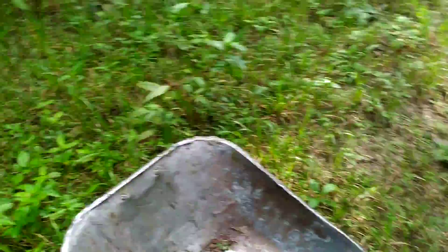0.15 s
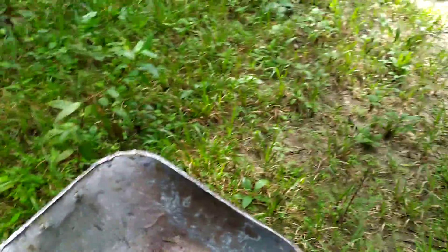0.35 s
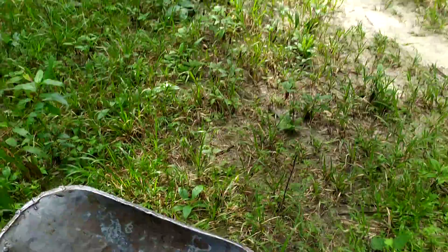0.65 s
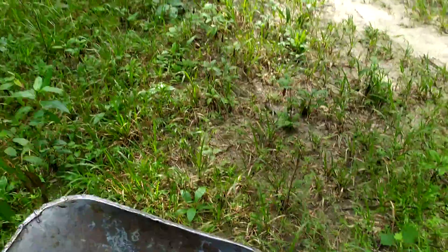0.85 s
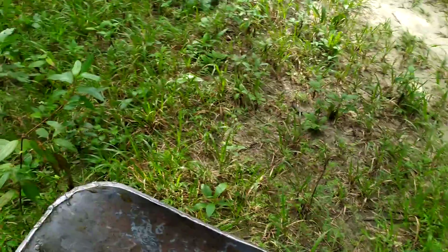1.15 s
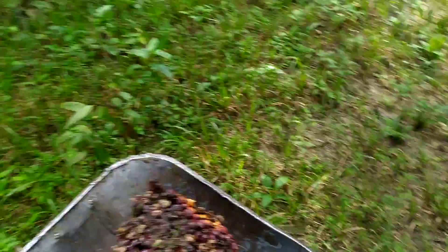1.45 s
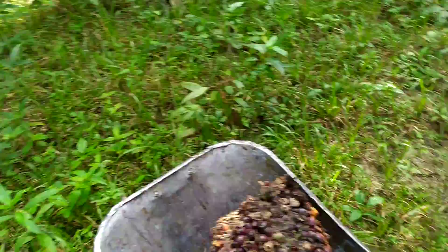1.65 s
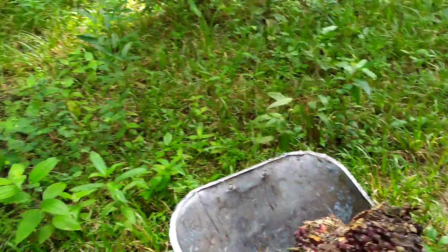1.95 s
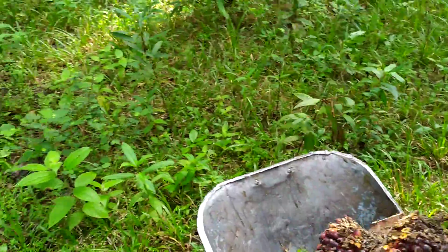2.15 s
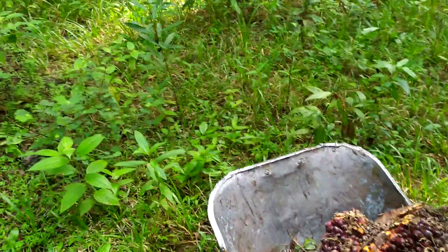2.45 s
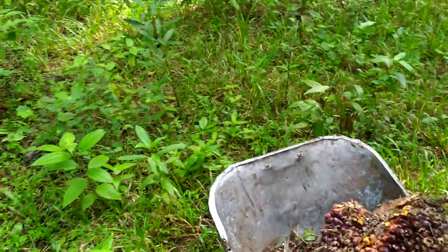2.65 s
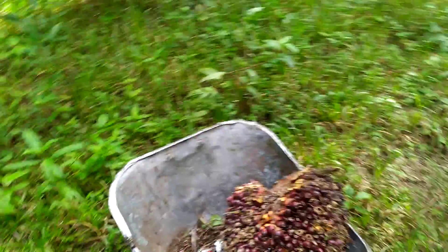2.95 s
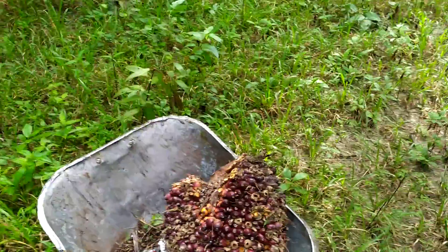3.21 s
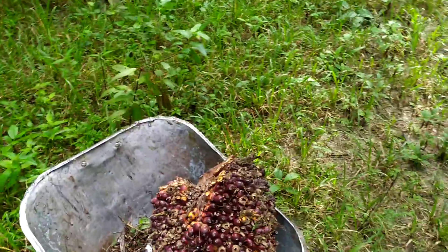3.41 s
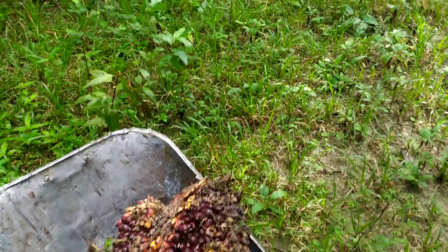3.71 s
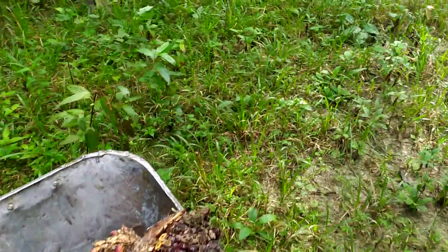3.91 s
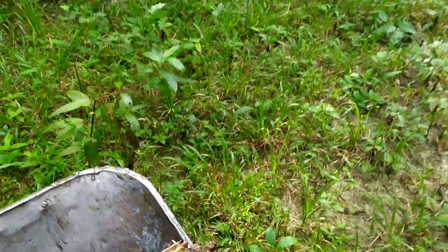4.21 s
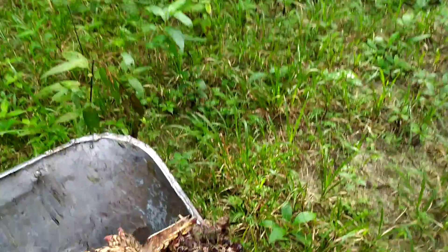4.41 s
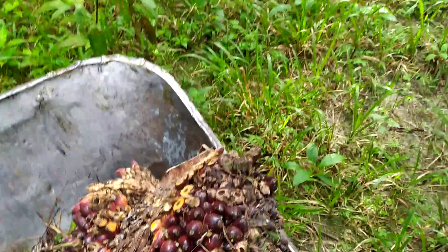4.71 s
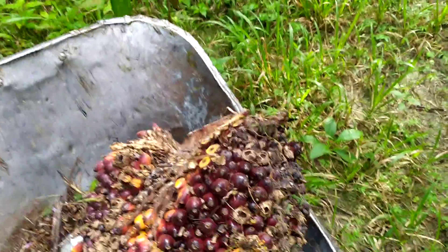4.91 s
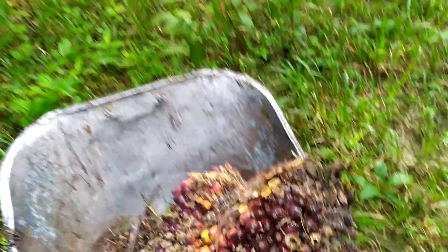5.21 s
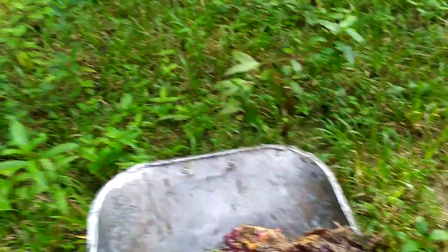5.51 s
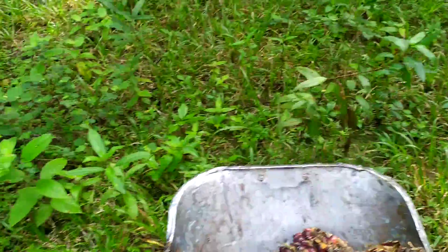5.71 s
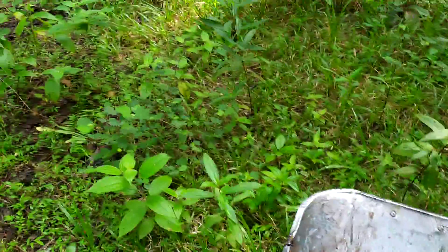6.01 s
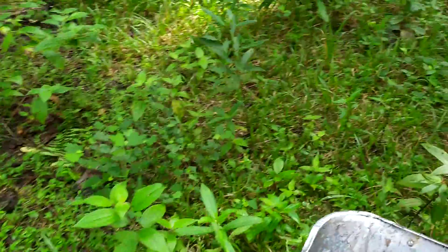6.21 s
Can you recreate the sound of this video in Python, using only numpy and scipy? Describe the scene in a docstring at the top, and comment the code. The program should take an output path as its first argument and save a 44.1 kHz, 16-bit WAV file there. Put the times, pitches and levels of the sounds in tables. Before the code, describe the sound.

Outdoors, over a faint, high insect hiss, a nearby steel wheelbarrow booms twice as spiky fruit bunches land in it, the second louder. Dry fibres crackle and fruit rolls against the tray, then things go quiet. Two sharp, ringing clangs of a metal tool come with further crunching thumps and tumbling fruit. Finally the wheelbarrow is pushed on, with a light rattle and rustling grass.

```python
"""Loading palm fruit into a wheelbarrow

Heavy bunches land in a steel wheelbarrow on rough grass. The tray booms, dry spikes on the bunches
crunch and loose fruit tumbles; twice a steel tool clangs on the rim and rings. After each landing the
load settles. Then the barrow is pushed on through swishing grass. Insects hiss all around."""
import sys
import numpy as np
from scipy import signal
from scipy.fft import rfft, irfft, next_fast_len
from scipy.io import wavfile

SR = 44100
rng = np.random.default_rng(int(sys.argv[2]) if len(sys.argv) > 2 else 0)


def transcribe(signal):
    """Save signal, clipped to [-1, 1], as a 16-bit WAV file at the path in sys.argv[1]."""
    frames = np.atleast_2d(signal).T
    limited = np.clip(frames, -1, 1)
    pcm = np.round(limited * 32767).astype(np.int16)
    wavfile.write(sys.argv[1], SR, pcm)


N = 280476
TIME = np.arange(N) / SR

# the tones at which the side panels of the loaded tray ring: f/Hz
PANEL_TONES = [105, 145, 180, 258, 312, 345, 378, 410, 438, 475, 505, 560, 622, 648, 725, 763, 840, 903,
               965, 1028, 1135, 1215, 1340, 1590, 1790]
# how alike the two ears hear a sound: f/Hz, likeness (0 to 1)
EAR_LIKENESS = [(50, 0.83), (200, 0.96), (400, 0.94), (700, 0.77), (1300, 0.33), (2400, 0.15), (8000, 0.02)]
# pushes through the grass: t/s, rustle level/dB, swish level/dB, swish build-up/s
GRASS_PUSHES = [(5.658, -50, -43.5, 0.12), (6.27, -49.5, -45.5, 0.15)]


def from_db(db):
    """Turn decibels into a gain to multiply by."""
    return 10 ** (np.asarray(db) / 20)


def together_db(*gains):
    """The level of unrelated sounds heard together: their powers add."""
    return 10 * np.log10(sum(g ** 2 for g in gains) + 1e-20)


def unit_power(x):
    """Scale a signal to an average power of 1."""
    return x / np.sqrt(np.mean(x ** 2) + 1e-20)


def at_hz(points, hz):
    """Read between the rows of a (frequency, value) table, with octaves evenly spaced."""
    f, value = np.transpose(points)
    return np.interp(np.log(np.maximum(hz, 1)), np.log(f), value)


def in_time(points):
    """Join the rows of a (time, value) table with straight lines."""
    return np.interp(TIME, *np.transpose(points))


def add(out, start_s, sound):
    """Mix a sound in at its start time."""
    i = max(round(start_s * SR), 0)
    out[:, i:i + sound.shape[-1]] += sound[..., :N - i]


def fade(t, t60, rise_s):
    """Rise quickly, then die away; t60 is the time in seconds to fall by 60 dB."""
    return (1 - np.exp(-t / rise_s)) * np.exp(-np.log(1000) * t / t60)


def swells(rows, width_s):
    """A gain that rises and falls in a bell shape around each (time, level) row."""
    return sum(from_db(db) * np.exp(-.5 * ((TIME - s) / width_s) ** 2) for s, db, *_ in rows)


def drift(per_s, count=N):
    """A random wobble of size about 1 that heads for a new value per_s times a second."""
    targets = rng.standard_normal(int(per_s * count / SR) + 2)
    return unit_power(np.interp(TIME[:count] * per_s, np.arange(len(targets)), targets))


def two_ears(pair, hz):
    """Turn two unrelated signals into left and right, alike in the bass only."""
    alike = np.clip(at_hz(EAR_LIKENESS, hz), 0, .995)
    mid, side = np.sqrt(1 + alike) * pair[0], np.sqrt(1 - alike) * pair[1]
    return np.array([mid + side, mid - side])


def coloured(white, spectrum, tilt_db=0):
    """Shape stereo noise to a spectrum, tilted by tilt_db per octave, at power 1."""
    count = white.shape[-1]
    size = next_fast_len(count)
    hz = np.maximum(np.fft.rfftfreq(size, 1 / SR), 1)
    bass_cut = 1 / np.sqrt(1 + (spectrum[0][0] / hz) ** 4)
    gain = bass_cut * from_db(at_hz(spectrum, hz) + tilt_db * np.log2(hz))
    shaped = two_ears(rfft(white, size), hz) * gain
    return unit_power(irfft(shaped, size)[:, :count])


def grainy(count, spread_db, size=24):
    """Stereo noise made of half-millisecond grains of uneven strength."""
    grains = from_db(spread_db * np.clip(rng.standard_normal(count // size + 1), -2.5, 2.5))
    return rng.standard_normal((2, count)) * np.repeat(grains, size)[:count]


def air_and_insects(air_db=-64.5, insect_db=-57):
    """Insects hiss, wavering slightly, over the faint noise of still air."""
    # spectra of the two sounds: f/Hz, level/dB
    air_spectrum = [(110, -9), (230, 2.5), (370, 4), (600, -4), (1200, -10.5), (2500, -11), (4000, -11.5),
                    (9000, -6.5), (16000, -9)]
    insect_spectrum = [(3000, -34.5), (3950, -17.5), (4500, 5), (5200, -1.5), (5800, 5), (6300, 0),
                       (7000, 3), (8300, -1.5), (9500, -17), (15000, -18.5)]
    air = from_db(air_db) * coloured(rng.standard_normal((2, N)), air_spectrum)
    insect_gain = from_db(insect_db + 1.1 * drift(4.8))
    return air + insect_gain * coloured(rng.standard_normal((2, N)), insect_spectrum)


def rumble(shudder, breeze_db=-62):
    """A breeze and the shaking barrow make a soft, deep rumble that briefly swells three times."""
    # deep swells (wind at the start and near 4 s, a bunch's low thump at 1.1 s): t/s, level/dB
    deep_swells = [(0.03, -52), (1.1, -42.5), (4.02, -51)]
    # spectrum of the rumble: f/Hz, level/dB
    spectrum = [(30, -24.5), (40, -2.5), (55, 6.5), (80, -5), (130, -10.5), (250, -27.5), (600, -64.5)]
    level_db = together_db(shudder, from_db(breeze_db), swells(deep_swells, width_s=0.066))
    return from_db(level_db + drift(60)) * coloured(rng.standard_normal((2, N)), spectrum)


def rustle(level_db, boost_db=6, flutter_db=2, crackles_per_s=63, crackle_db=-1, crackle_t60=0.011):
    """Grass and fibres brush along the steel; stalks that catch make tiny crackles."""
    # spectrum of the brushing: f/Hz, level/dB
    spectrum = [(600, -11), (1300, -1.5), (2800, -2.5), (5000, -3), (9000, 1), (12000, -3), (16000, -7.5)]
    catches = (rng.random(N) < crackles_per_s / SR) * rng.random(N) * from_db(crackle_db)
    decay = np.exp(-np.log(1000) / (crackle_t60 * SR))
    crackle = signal.lfilter([1], [1, -decay], catches + 1e-18)
    gain = from_db(level_db + boost_db + flutter_db * drift(45))
    return gain * (1 + crackle) * coloured(grainy(N, spread_db=0.5), spectrum)


def loose_fruit(level_db, per_s, spread_db, t60, low_hz, soft_hz):
    """Fruit rolls and drops, tapping the panels; light fruit misses low tones, soft fruit high ones."""
    drops = (rng.random(N) < per_s / SR) * from_db(spread_db * np.minimum(rng.standard_normal(N), 1))
    at, out = np.flatnonzero(drops), np.zeros((2, N))
    decay = np.exp(-np.log(1000) / (t60 * SR))
    for hz in PANEL_TONES:
        taps = np.full((2, N), 1e-18)
        taps[:, at] = drops[at] * two_ears(rng.standard_normal((len(at), 2)).T, hz)
        step = 2 * np.pi * hz / SR
        ringing = signal.lfilter([0, np.sin(step)], [1, -2 * decay * np.cos(step), decay ** 2], taps)
        weight = 1 / np.hypot(1, (low_hz / hz) ** 2) / np.hypot(1, hz / soft_hz)
        out += weight * ringing
    return from_db(level_db) * unit_power(out)


def through_sheet(x, direct_db=-1.5, sheet_db=-6.5, t60=0.1, tones=110):
    """Whatever is crushed against the tray also sets off short, tinny tones in its thin steel."""
    t = TIME[:SR // 8]
    hz = rng.uniform(900, 15500, (tones, 1))
    strength = rng.standard_normal((2, tones))
    ring = strength @ np.sin(2 * np.pi * hz * t) * fade(t, t60, rise_s=0.00027)
    ring /= np.sqrt(np.sum(ring ** 2, axis=1, keepdims=True))
    return from_db(direct_db) * x + from_db(sheet_db) * signal.fftconvolve(x, ring, axes=1)[:, :N]


def dry_spikes(clump_db=1.5, snap_t60=0.0078):
    """Dry fibres break in clumps of tiny cracks, single stalks with one bright snap."""
    # spikes crushed against the steel: t/s, level/dB, t60/s, tilt/(dB per octave)
    crunches = [(0.592, -16.5, 0.18, 5.5), (0.989, -37, 0.087, 2.5), (1.112, -20, 0.063, -2.5),
                (1.12, -5.5, 0.05, 2.7), (1.129, -25, 0.73, 1), (1.331, -27.5, 0.16, 0.5),
                (1.354, -28.5, 0.26, 0), (1.688, -35, 0.16, 8), (1.853, -22.5, 0.036, 1.5),
                (2.118, -45, 0.23, 1), (2.204, -31, 0.15, 3.5), (2.238, -29.5, 0.15, 3),
                (2.327, -30.5, 0.051, -2), (2.59, -38, 0.13, 2.5), (2.972, -44, 0.1, 9),
                (3.569, -48, 0.62, 10), (4.071, -11, 0.059, -0.5), (4.078, -26.5, 0.41, 2),
                (4.440, -11.5, 0.078, 3), (4.511, -19.5, 0.27, -0.5), (4.683, -35, 0.16, -2)]
    # stalks snapping: t/s, level/dB
    snaps = [(1.121, -10), (1.496, -25.5), (1.524, -30), (1.587, -45), (1.597, -25.5), (1.612, -29),
             (1.679, -26), (1.691, -20.5), (1.846, -22.5), (1.853, -23), (1.934, -34), (1.952, -35),
             (2, -24.5), (2.12, -33), (2.207, -21.5), (2.328, -36), (2.592, -38), (2.941, -32),
             (6.098, -30.5)]
    # spectrum of breaking fibres: f/Hz, level/dB
    spectrum = [(700, 14), (1300, 11.5), (2500, 3), (4500, 0), (7000, -1.5), (11000, -7), (16000, -15.5)]
    out = np.zeros((2, N))
    t = TIME[:SR // 2]
    for s, db, t60, tilt_db in crunches:
        clumps = unit_power(from_db(clump_db * drift(300, len(t))))
        cracks = coloured(grainy(len(t), spread_db=-2.0), spectrum, tilt_db)
        add(out, s, from_db(db) * clumps * fade(t, t60, rise_s=0.0012) * cracks)
    out = through_sheet(out)
    t = TIME[:SR // 20]
    for s, db in snaps:
        bright_noise = coloured(rng.standard_normal((2, len(t))), spectrum, tilt_db=7.5)
        add(out, s, from_db(db) * fade(t, snap_t60, rise_s=.0001) * bright_noise)
    return out


def settling(rise_s=0.085, rolling_db_per_s=21, resting_db_per_s=135.5, shudder_db=-18):
    """Gains of fruit, fibres and the barrow's shudder; the load slows as it rolls, then stops fast."""
    # a bunch lands or slips: t/s, fruit level/dB, fibre level/dB, rolling time/s
    landings = [(0.594, -46.5, -45.5, 0.27), (1.116, -28, -66, 0.3), (1.66, -46, -64, 0.64),
                (2.2, -46.5, -77, 0.2), (4.071, -39.5, -51, 0.25), (4.441, -27.5, -56, 0.32)]
    fruit, fibres, shudder = np.zeros((3, N))
    for s, fruit_db, fibre_db, rolling_s in landings:
        t = np.maximum(TIME - s, 0)
        fall_db = rolling_db_per_s * np.minimum(t, rolling_s)
        fall_db += resting_db_per_s * np.maximum(t - rolling_s, 0)
        motion = (1 - np.exp(-t / rise_s)) * from_db(-fall_db)
        fruit += from_db(fruit_db) * motion
        fibres += from_db(fibre_db) * motion
        shudder += from_db(fruit_db + shudder_db) * fade(t, t60=0.47, rise_s=.004)
    return fruit, fibres, shudder


def panels(t, centre_hz, t60, contact_s, load_shift=0.02555, top_hz=1150):
    """One blow rings all panel tones, most of all near centre_hz; the load shifts them a little."""
    count = len(PANEL_TONES)
    hz = np.array(PANEL_TONES) * (1 + load_shift * rng.standard_normal(count))
    weight = 1 / (1 + np.log2(hz / centre_hz) ** 2) ** 2
    weight /= np.hypot(1, (hz / top_hz) ** 4)   # soft fruit cannot drive the highest tones
    size_and_phase = rng.uniform(0.34, 1, (2, count)) * np.exp(2j * np.pi * rng.random((2, count)))
    strength = two_ears(size_and_phase, hz) * weight
    phase = 2 * np.pi * hz[:, None] * t
    shape = fade(t, t60, rise_s=contact_s)
    wave = (strength.real @ np.sin(phase) + strength.imag @ np.cos(phase)) * shape
    return unit_power(wave) * np.sqrt(np.mean(shape ** 2))


def tray_booms(stiffening=0.055, ears_apart_rad=0.099, lowest_hz=75):
    """The tray's floor booms, a little higher while deeply bent, and its side panels clatter."""
    # bunches hitting the floor: t/s, boom level/dB, boom f/Hz, boom t60/s, panel level/dB
    blows = [(0.595, -12.5, 205.3, 0.23, -14.5), (0.617, -13, 201.7, 0.14, -27.5),
             (0.642, -20.5, 206, 0.13, -36), (0.656, -17.5, 205, 0.084, -31), (0.693, -28, 211, 0.13, -47),
             (0.721, -26, 211, 0.086, -43), (0.755, -24.5, 202, 0.077, -41), (0.784, -34, 183, 0.16, -46),
             (0.891, -30.5, 286, 0.051, -42.5), (0.936, -38.5, 208, 0.11, -56), (1.11, -14, 253, 0.07, -24),
             (1.122, -19, 148.3, 0.31, -22), (1.141, -15.5, 212, 0.12, -16.5),
             (1.169, -7.5, 230, 0.042, -25), (1.183, -8, 265, 0.067, -24.5), (1.202, -15, 215, 0.06, -26.5),
             (1.218, -21.5, 253.6, 0.14, -21), (1.242, -17.5, 233, 0.15, -31),
             (1.261, -18.5, 226, .09, -28.5), (1.316, -13, 246, 0.13, -20),
             (1.355, -22.5, 242, 0.16, -20.5), (1.379, -22.5, 208.2, 0.073, -22.5),
             (1.457, -19, 245, 0.053, -31.5), (1.688, -34.5, 206, 0.073, -53),
             (1.85, -30.5, 306, 0.033, -37.5), (1.998, -33, 139, 0.019, -46),
             (2.056, -40.5, 166, 0.063, -53), (2.208, -28, 331, 0.092, -32),
             (2.257, -29.5, 341, 0.061, -31), (2.329, -39, 269, 0.24, -40.5),
             (2.418, -32, 239, 0.15, -42.5), (2.495, -47.5, 201, 0.23, -59), (2.591, -40.5, 197, 0.18, -41),
             (2.776, -58.5, 352, 0.34, -59.5), (4.078, -11, 263, 0.14, -18), (4.108, -20, 203.7, 0.23, -23),
             (4.217, -33, 263, 0.15, -31.5), (4.246, -34, 242, 0.25, -44), (4.312, -40.5, 221, 0.28, -41),
             (4.442, -18, 229, 0.24, -12.5), (4.458, -12.5, 217, 0.028, -12), (4.51, -14, 253, 0.095, -10),
             (4.525, -12, 437, 0.099, -19), (4.555, -12.5, 221.6, 0.16, -17),
             (4.602, -21, 223, 0.23, -21.5), (4.648, -27, 223, 0.18, -47), (4.683, -26.5, 222, 0.15, -22.5),
             (4.724, -25.5, 218, 0.14, -27), (4.749, -26, 212, 0.16, -32.5), (4.787, -27, 219, 0.13, -28.5),
             (4.823, -30.5, 223, 0.24, -35), (4.858, -33.5, 212.4, 0.17, -52),
             (4.894, -35.5, 215.4, 0.17, -52), (4.934, -37, 187, 0.18, -39), (5.602, -39.5, 352, 0.16, -39),
             (5.625, -44, 180, 0.14, -37), (5.7, -45.5, 247, .18, -47), (6.233, -41.5, 213, 0.12, -32)]
    out = np.zeros((2, N))
    for s, boom_db, boom_hz, boom_t60, panel_db in blows:
        hardness_db = panel_db - boom_db   # a harder hit rings the panels higher and shorter
        centre_hz = 495 * 2 ** (hardness_db / 11.5)
        panel_t60 = 0.14 * 2 ** (-hardness_db / 12.5)
        t = TIME[:int(max(boom_t60, panel_t60) * SR)]
        bend = fade(t, boom_t60, rise_s=0.00056)
        # the bunch bounces, so the boom wobbles in pitch and strength
        sway, press = .065 * drift(130, len(t)), from_db(1.8 * drift(110, len(t)))
        pitch_hz = boom_hz * (1 + stiffening * (bend - .5) + sway)
        ear_phase = ears_apart_rad * rng.standard_normal((2, 1))
        boom = bend * press * np.sqrt(2) * np.sin(2 * np.pi * np.cumsum(pitch_hz) / SR + ear_phase)
        clatter = panels(t, centre_hz, panel_t60, contact_s=0.0051)
        add(out, s, from_db(boom_db) * boom + from_db(panel_db) * clatter)
    return signal.sosfilt(signal.butter(2, lowest_hz, "high", fs=SR, output="sos"), out)


def fruit_knocks():
    """A single hard fruit is too light to move the floor and rings only the panels."""
    # knocks on the side panels: t/s, level/dB, centre f/Hz, t60/s
    knocks = [(0.6, -23, 850, 0.19), (0.988, -48, 620, 0.12), (1.172, -20, 790, 0.16),
              (1.243, -15, 820, 0.052), (1.266, -18, 830, 0.079), (1.458, -11.5, 753, 0.025),
              (1.761, -30, 1360, 0.021), (2.121, -34, 660, 0.022), (2.18, -39.5, 610, 0.13),
              (2.23, -26.5, 404, 0.11), (4.073, -22, 1000, 0.078), (4.747, -25, 750, 0.15),
              (3.775, -61, 1400, 0.033), (3.815, -58.5, 521, 0.047), (5.626, -36, 800, 0.052),
              (5.697, -29, 496, 0.051), (5.829, -38, 850, 0.045), (6.243, -37, 950, 0.06)]
    out = np.zeros((2, N))
    for s, db, centre_hz, t60 in knocks:
        add(out, s, from_db(db) * panels(TIME[:int(t60 * SR)], centre_hz, t60, contact_s=0.0018))
    return out


def frame_jolts(sag=0.14):
    """The loaded frame gives a short, deep thump that sags in pitch."""
    # heavy blows that jolt the whole barrow: t/s, level/dB, f/Hz, t60/s
    jolts = [(0.751, -29, 120, 0.15), (0.905, -32, 140, 0.072), (1.123, -28, 118, 0.1),
             (1.17, -17.5, 112, .12), (1.205, -22, 129, 0.11), (1.317, -14.5, 127, 0.079),
             (1.382, -37.5, 130, .1), (1.855, -32, 135.1, 0.12), (2.427, -31, 140, 0.077),
             (4.083, -31.5, 141, 0.21), (4.556, -19, 135, .14), (4.79, -40, 138, 0.3)]
    out = np.zeros((2, N))
    for s, db, hz, t60 in jolts:
        bend = fade(TIME[:int(t60 * SR)], t60, rise_s=0.0017)
        pitch_hz = hz * (1 + sag * (bend - .5))
        add(out, s, from_db(db) * bend * np.sin(2 * np.pi * np.cumsum(pitch_hz) / SR))
    return out


def ringing_steel(tones, blows, m_per_s, waver_db=1.2, detune=.0007, sound_m_per_s=343):
    """Struck steel wavers as it swings; if it moves, its echo makes it pulse, faster in high tones."""
    # echo off the tray: f/Hz, share reflected (0 to 1)
    reflection = [(1479, .58), (1925, .12), (3113, .6), (6500, .55), (9000, .35)]
    out = np.zeros((2, N))
    for hz, db, t60 in tones:
        t = TIME[:int(min(2 * t60, 1) * SR)]
        ear_phase = np.arccos(np.clip(at_hz(EAR_LIKENESS, hz), 0, 1)) * rng.choice([-.5, .5])
        swing = np.sin(2 * np.pi * (rng.uniform(2.4, 8.5) * t + rng.random()))
        phase = 2 * np.pi * hz * np.cumsum(1 + detune * swing) / SR
        echo = at_hz(reflection, hz)
        pulsing = (1 + echo * np.exp(2j * np.pi * hz * t * m_per_s / sound_m_per_s)) / (1 + echo)
        shape = from_db(waver_db * swing) * fade(t, t60, rise_s=1 / hz)   # builds up in about a cycle
        tone = pulsing * shape * np.exp(1j * np.array([phase + ear_phase, phase - ear_phase]))
        for s, blow_db, free_s, damping_db_per_s in blows:
            strength = from_db(db + blow_db - damping_db_per_s * np.maximum(t - free_s, 0))
            add(out, s, strength * (tone * np.exp(2j * np.pi * rng.random())).real)
    return out


def clangs(tool_m_per_s=.25, sheet_count=140):
    """Tool, bowl, rim and thin sheet ring together until a hand or the load damps them."""
    # steel hits steel: t/s, bowl/dB, rim/dB, tool/dB, sheet/dB, free ringing/s, damping/(dB per s)
    strikes = [(4.071, -0.5, -1, -46, 8, 0.097, 98), (4.214, -46, -10.5, -35, -18, 0.11, 243),
               (4.440, -11.5, -19, 2.5, -6, 0.6, 91), (4.512, -19, -3, -11, -26, 0.12, 64)]
    # tones of the tool, the tray's whole bowl and its rim: f/Hz, level/dB, t60/s
    tool_tones = [(1479, -29, 2.15), (1535, -30.5, .85), (1925, -24.5, 1.7), (2420, -40, .35),
                  (3113, -26.5, .8), (3407, -40, 1.4), (3830, -43, .9), (4196, -36, .85), (4620, -45, .9),
                  (5116, -28, .34), (6090, -39, .5), (6173, -35, .75), (6363, -37, .65), (6484, -28, .85),
                  (6604, -30, .8), (7168, -29.5, .6), (7588, -26, .38), (7780, -40, .6), (8846, -17, .26),
                  (8910, -29, .2), (9885, -19, .27), (9990, -33, .2), (10712, -25.5, .52), (10790, -34, .4),
                  (13370, -33, .4), (13495, -22, .29), (13661, -27, .23), (13820, -31, .2),
                  (14389, -30, .2), (14520, -37, .3), (14658, -31, .35), (14840, -36, .2),
                  (15247, -25, .17), (15630, -32, .17)]
    bowl_tones = [(210, -11, .42), (334, -17, .27), (365, -22, .45), (452, -29, .25), (1028, -15.5, .32)]
    rim_tones = [(621, -35, .8), (763, -32, .4), (962, -31, .25), (1135, -33, .25), (1168, -27, .25),
                 (1540, -33, .45), (2035, -24.5, .55), (2651, -31.5, .6), (2688, -39, .7), (3398, -40, .45),
                 (3735, -39, .5), (4170, -36, .3), (4570, -40, .25), (5103, -38, .2), (6444, -44, .6),
                 (6574, -41, .45), (7601, -38, .2), (8810, -44, .2)]
    # the sheet adds a splash of short, high tones
    sheet_hz = rng.uniform(1302, 15500, sheet_count)
    sheet_levels_db = -44.5 + 3 * rng.standard_normal(sheet_count)
    sheet_t60 = 0.12 * rng.uniform(0.29, 1.7, sheet_count)
    sheet_tones = zip(sheet_hz, sheet_levels_db, sheet_t60)
    s, bowl_db, rim_db, tool_db, sheet_db, free_s, damping = np.transpose(strikes)
    parts = [(tool_tones, tool_db, tool_m_per_s), (bowl_tones, bowl_db, 0),
             (rim_tones, rim_db, 0), (sheet_tones, sheet_db, 0)]
    return sum(ringing_steel(tones, list(zip(s, db, free_s, damping)), m_per_s)
               for tones, db, m_per_s in parts)


def wheel(bump_db=4.0):
    """Lumps in the ground shake the tray through the wheel, so it drums softly."""
    # loudness as the wheel rolls off: t/s, level/dB
    rolling = [(4.9, -100), (5.12, -56.5), (5.4, -60.5), (5.9, -65.5), (6.36, -58)]
    # spectrum of the drumming tray: f/Hz, level/dB
    spectrum = [(130, -2.5), (210, -1), (300, -8), (500, -17), (1000, -49.5)]
    gain = from_db(in_time(rolling) + bump_db * drift(28))
    return gain * coloured(rng.standard_normal((2, N)), spectrum)


def grass_swish(fall_s=0.081, flutter_db=1.5):
    """Grass blades slide along the tray at each push, building slowly and letting go quickly."""
    # spectrum of blades sliding on steel: f/Hz, level/dB
    spectrum = [(6500, -7), (9000, 2), (12000, -4), (16000, -10)]
    gain = sum(swells([(s, db)], width_s=np.where(TIME < s, rise_s, fall_s))
               for s, _, db, rise_s in GRASS_PUSHES)
    return gain * from_db(flutter_db * drift(70)) * coloured(grainy(N, spread_db=2.5), spectrum)


def scene():
    """Mix surroundings and blows; landings, pushes and stirring move the fruit and fibres."""
    # how much the barrow is stirred between landings, heard as rustle: t/s, level/dB
    stirring = [(0, -59.5), (.5, -62.5), (1.05, -57), (1.6, -54.5), (2.4, -62), (2.8, -65.5), (3.05, -73.5),
                (3.5, -66), (4.0, -76.5), (4.9, -66.5), (5.2, -61), (5.45, -58.5), (5.85, -61),
                (6.05, -54.5), (6.36, -58.5)]
    stir_db = in_time(stirring)
    push = swells(GRASS_PUSHES, width_s=0.074)
    fruit, fibres, shudder = settling()
    stirred_fruit = from_db(-64.5 + 1.14 * (stir_db - stir_db.mean()))   # light fruit follows the stir
    jostle_db = together_db(stirred_fruit, from_db(1) * push)
    rustle_db = together_db(fibres, from_db(stir_db), push)
    surroundings = air_and_insects() + rumble(shudder) + rustle(rustle_db) + grass_swish() + wheel()
    hits = clangs() + dry_spikes() + fruit_knocks() + tray_booms() + frame_jolts()
    tumbling = loose_fruit(together_db(fruit), per_s=170, spread_db=5, t60=0.09, low_hz=120, soft_hz=375)
    jostling = loose_fruit(jostle_db, per_s=97, spread_db=0, t60=0.12, low_hz=307.4, soft_hz=384)
    return surroundings + hits + tumbling + jostling


def record(dry):
    """Round off the loudest peaks, then cut the deepest bass and the highest treble."""
    ceiling, lowest_hz, highest_hz = .8, 36, 16100
    rounded = ceiling * np.tanh(dry / ceiling)
    trimmed = signal.sosfilt(signal.butter(2, lowest_hz, "high", fs=SR, output="sos"), rounded)
    return signal.sosfilt(signal.ellip(10, .1, 90, highest_hz, fs=SR, output="sos"), trimmed)


dry = scene()
out = record(dry)
transcribe(out)
```